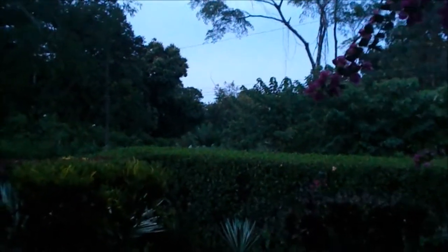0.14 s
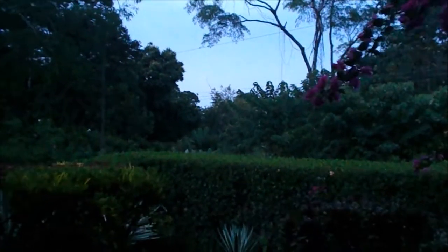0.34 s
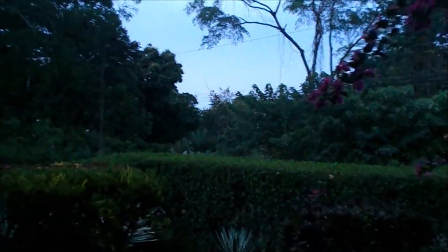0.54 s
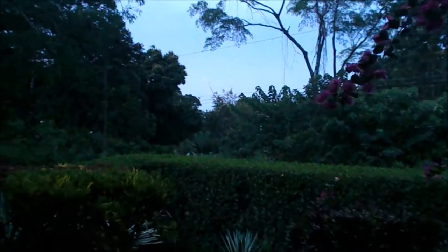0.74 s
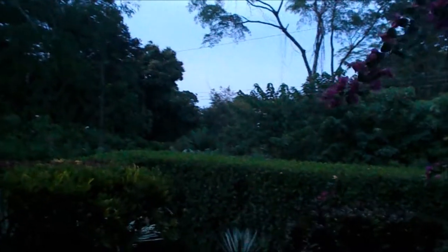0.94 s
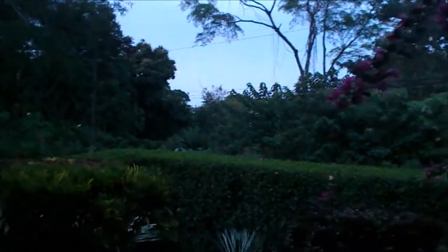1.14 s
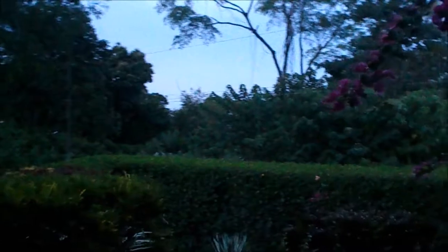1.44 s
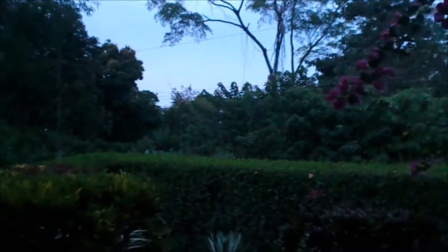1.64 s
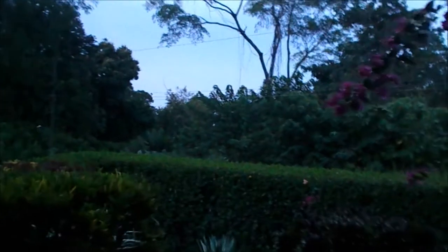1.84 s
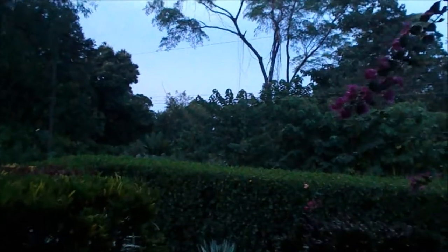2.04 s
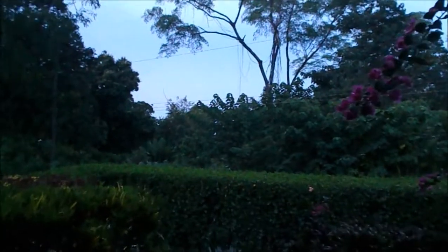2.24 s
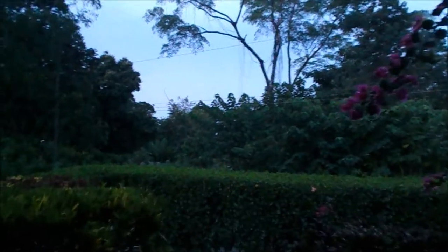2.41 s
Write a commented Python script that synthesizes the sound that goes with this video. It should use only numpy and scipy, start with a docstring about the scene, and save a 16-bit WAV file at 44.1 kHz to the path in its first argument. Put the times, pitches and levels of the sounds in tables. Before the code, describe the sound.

A distant, rasping roar of howler monkeys echoes through the trees, breaking into hoots and fading. Closer birds sing rising whistles, a slowing trill and high peeps above an outdoor insect wash, with one short rustle and tiny ticks nearby.

```python
"""Howler monkeys roar far off in dawn woodland, ending in a few hoots and dying away. The roar is a source and
filter: uneven pulses and rasp excite throat resonances that move with the mouth. Nearer birds sing gliding
tones: rising pairs of whistles, a slowing trill, slurs and peeps. Trunks and foliage scatter these calls into
echoes, over a trilling cricket and a wash of insects and far birds. Close by there is one rustle and two ticks,
and a faint dull click sounds at 1.425 s."""
import sys
import numpy as np
from scipy import signal
from scipy.fft import rfft, irfft
from scipy.io import wavfile
from scipy.ndimage import uniform_filter1d

SR = 44100
rng = np.random.default_rng(int(sys.argv[2]) if len(sys.argv) > 2 else 0)


def digitize_waveform(pressure):
    """Quantize a signal to 16-bit integers and store it at the path in sys.argv[1].

    Rows of a 2-D input are taken as channels; values are limited to [-1, 1].
    """
    field = np.atleast_2d(pressure).T
    bounded = np.clip(field, -1, 1)
    quanta = np.round(bounded * 32767).astype(np.int16)
    wavfile.write(sys.argv[1], SR, quanta)


N = 113337
T = np.arange(N) / SR
NOTE_EDGE_S = .008  # onset and release of a note

# reverberation time among the trees (f/Hz, time to fall 60 dB/s)
FOREST_T60 = [(300, 0.96), (2500, 0.7), (8000, 0.69)]
# envelopes of the roar (t/s, relative level of the low formants/dB, of the high formants/dB)
ROAR_LEVELS = [(0, -25.5, -19), (.12, -30, -28.5), (.31, -34.5, -28.5), (.48, -28.5, -27.5),
               (.75, -31, -27), (.87, -26, -27), (1.1, -30.5, -29.5), (1.25, -30.5, -27.5),
               (1.4, -29.5, -31), (1.52, -38, -30.5), (1.57, -30.5, -33), (1.64, -35.5, -30),
               (1.8, -45, -30.5), (1.87, -38, -36.5), (2.12, -42, -34), (2.42, -45.5, -43),
               (2.57, -39, -37.5)]
# low and high throat resonances at a mouth factor of 1 (f/Hz, width/Hz, relative level/dB)
LOW_FORMANTS = [(449, 152, 0.5), (503.7, 103, 4.5)]
HIGH_FORMANTS = [(800, 330, -1.5), (942.4, 193, 1.5), (1291, 460, -8), (1520, 150, -10), (2040, 500, -10.5)]
# mouth opening (t/s, factor on all formant frequencies)
MOUTH_FACTOR = [(0, 0.93), (.17, 1.054), (.5, 0.93), (.72, 1.028), (1.0, 0.97), (1.27, 0.91), (1.5, 1.015),
                (1.62, 0.98), (1.8, 0.94), (2.57, 1.045)]
# clear hoots within the roar (t/s, duration/s, start f/Hz, end f/Hz, level/dB)
HOOT_NOTES = [(.02, 0.18, 890, 1007, -33.5), (.17, .15, 324.6, 284, -50.5), (.43, 0.17, 512, 494, -25.5),
              (.468, 0.055, 817, 824, -26), (.62, .2, 306.5, 285.4, -53), (.66, 0.097, 498, 470, -30.5),
              (.81, 0.099, 824, 820, -28.5), (1.04, .17, 287, 268, -54), (1.395, 0.092, 507.5, 468, -24.5),
              (1.62, 0.14, 921, 871, -30.5), (1.665, 0.16, 518, 484.4, -26.5)]
# envelope of the cricket (t/s, level/dB)
CRICKET_LEVEL = [(0, -19.5), (.04, -42), (.11, -25), (.2, -34), (.36, -34), (.51, -27), (.54, -40),
                 (.65, -25), (.71, -40), (.74, -30.5), (.9, -28), (1.12, -30), (1.18, -40), (1.23, -27),
                 (1.4, -27), (1.45, -26.5), (1.57, -39), (1.6, -26), (1.7, -25.5), (1.74, -37),
                 (1.82, -26.5), (1.89, -41), (1.92, -23.5), (1.98, -38), (2.02, -24.5), (2.12, -32),
                 (2.16, -23.5), (2.3, -26), (2.38, -33.5), (2.57, -38)]
# spectrum of far birds, insects and leaves (f/Hz, relative level/dB)
WASH_SPECTRUM = [(20, -61), (70, -44), (130, -42.5), (250, -30.5), (340, -28), (440, -9), (680, -9),
                 (1200, -12), (1950, -9.5), (2350, -1.5), (2800, 1.5), (3300, -12), (3900, -14),
                 (4800, -21), (5400, -18), (5850, -10.5), (6350, -15), (7200, -27.5), (9800, -29.5),
                 (11000, -36.5)]
# envelope of the far bird chorus (t/s, level/dB)
CHORUS_LEVEL = [(0, -32.5), (.5, -42.5), (.9, -28.5), (1.3, -31.5), (1.75, -45.5), (1.95, -30.5),
                (2.3, -29.5), (2.57, -42)]
# unevenness of the wash (f/Hz, rms level fluctuation/dB)
WASH_FLUCTUATION = [(300, 3), (1500, 2.5), (3200, 3), (5000, 4), (8000, 3.5)]
# upward chips of the falling trill (t/s, middle f/Hz, level/dB)
TRILL_CHIPS = [(.045, 6080, -38), (.135, 6400, -46), (.23, 5910, -36.5), (.31, 5730, -37), (.4, 5600, -35),
               (.485, 5680, -35), (.572, 5620, -35), (.668, 5820, -38), (.75, 5490, -36),
               (.843, 5300, -35.5), (.941, 5320, -31.5), (1.025, 5250, -31), (1.158, 5250, -31.5),
               (1.265, 5390, -36.5), (1.37, 4900, -42), (1.475, 5000, -42.5), (1.595, 4780, -54),
               (1.73, 4350, -44), (1.86, 4360, -42.5), (2.01, 4140, -42), (2.152, 4180, -43)]
# one level whistle, then rising pairs (t/s, duration/s, start f/Hz, end f/Hz, level/dB)
WHISTLE_NOTES = [(.068, 0.068, 2820, 2805, -18.5), (.35, 0.15, 2224, 3007, -20.5),
                 (.52, 0.16, 2280, 2860, -22), (1.09, 0.12, 2233, 2992, -23.5),
                 (1.255, .15, 2225, 2845, -22.5), (1.82, 0.16, 2240, 3014, -25),
                 (1.985, 0.18, 2232, 2832, -23.5)]
# slurred notes of other birds (t/s, duration/s, start f/Hz, end f/Hz, level/dB)
SLUR_NOTES = [(.115, 0.096, 9300, 9300, -47), (.525, 0.046, 8540, 8250, -47.5),
              (.585, 0.08, 3188, 3250, -27), (.61, 0.17, 3980, 4590, -40), (1.12, 0.054, 6430, 8360, -33),
              (1.165, 0.0504, 8500, 8860, -35), (1.925, 0.052, 8700, 8230, -44),
              (2.28, 0.15, 3300, 3474, -34), (2.44, 0.14, 3340, 3170, -29.5)]
# contour of one long falling whistle (t/s, f/Hz, level/dB)
FALLING_CONTOUR = [(.725, 4000, -38), (.738, 3924, -29), (0.771, 3670, -33), (.805, 3505, -27),
                   (0.851, 3416, -32), (1.02, 3330, -41)]
# spectrum of the rustle (f/Hz, relative level/dB)
RUSTLE_SPECTRUM = [(200, -58), (1400, -30), (2100, -10), (2900, -4), (4200, -22), (5500, -16.5),
                   (7200, -24.5), (10400, -25), (11200, -49)]
# close ticks (t/s, level/dB)
TICK_EVENTS = [(1.0605, -8.5), (2.0912, -5)]
# short clear peeps (t/s, duration/s, start f/Hz, end f/Hz, level/dB)
PEEP_NOTES = [(1.308, .1, 7400, 6520, -29), (1.497, .035, 5400, 5330, -38), (1.625, 0.036, 5080, 5130, -34)]
# long thin whistles (t/s, duration/s, start f/Hz, end f/Hz, level/dB)
THIN_NOTES = [(1.8, 0.22, 7370, 7310, -50), (2.03, 0.18, 7150, 7080, -51)]


def amp(db):
    """Amplitude ratio of a level in decibels."""
    return 10 ** (np.asarray(db) / 20)


def unit(x):
    """Normalisation to an rms of 1."""
    return x / np.sqrt(np.mean(abs(x) ** 2) + 1e-20)


def envelope(points, column=1):
    """Amplitude envelope, interpolated in decibels over time."""
    rows = np.array(points)
    return amp(np.interp(T, rows[:, 0], rows[:, column]))


def at_frequency(points, hz):
    """Interpolation on a logarithmic frequency axis."""
    f, value = np.transpose(points)
    return np.interp(np.log(hz + 1), np.log(f + 1), value)


def colour(x, spectrum):
    """Spectral shaping by a tabulated filter, at an rms of 1."""
    gain = amp(at_frequency(spectrum, np.fft.rfftfreq(N, 1 / SR)))
    return unit(irfft(rfft(x) * gain, N))


def drift(rate_hz):
    """Random modulation: low-pass noise with an rms of 1."""
    rolloff = 1 + (np.fft.rfftfreq(N, 1 / SR) / rate_hz) ** 4
    return unit(irfft(rfft(rng.standard_normal(N)) / rolloff, N))


def resonate(x, hz, width_hz):
    """Double-pole resonance of unit gain, whose centre frequency may move."""
    carrier = np.exp(2j * np.pi * np.cumsum(hz * np.ones(N)) / SR)
    pole = np.exp(-np.pi * width_hz / SR)
    baseband = signal.lfilter([(1 - pole) ** 2], [1, -2 * pole, pole * pole], x / carrier)
    return 2 * (carrier * baseband).real


def add(mix, start_s, sound):
    """Superposition of a sound on the mix from a given time."""
    part = mix[max(round(start_s * SR), 0):][:len(sound)]
    part += sound[:len(part)]


def forest(x, wet_db):
    """Reverberation: trunks and foliage scatter part of the power into an exponentially decaying tail."""
    hz, t, spectra = signal.stft(rng.standard_normal(SR), SR, nperseg=256)
    decay = amp(-60 * t / at_frequency(FOREST_T60, hz)[:, None])
    tail = signal.istft(spectra * decay, SR, nperseg=256)[1]
    echo = signal.fftconvolve(x, tail / np.linalg.norm(tail))[:N]
    return (x + amp(wet_db) * echo) / np.hypot(1, amp(wet_db))


def notes(rows, bend, crest, taper, waver, waver_hz, flutter_db):
    """Modulated sine tones: bend > 1 levels off the glide, crest > 1 delays the peak of the swell."""
    out, wobble, flutter = np.zeros(N), drift(waver_hz), drift(waver_hz)
    for start, length, from_hz, to_hz, db in rows:
        progress = np.arange(0, length, 1 / SR) / length
        samples = (np.arange(len(progress)) + round(start * SR)) % N
        glide = to_hz + (from_hz - to_hz) * abs(1 - progress) ** bend
        hz = glide * (1 + waver * wobble[samples])
        tone = np.sin(2 * np.pi * np.cumsum(hz) / SR) * amp(flutter_db * flutter[samples])
        swell = abs(np.sin(np.pi * progress ** crest)) ** taper
        gate = np.minimum(np.minimum(progress, 1 - progress) * length / NOTE_EDGE_S, 1)
        add(out, start, amp(db) * unit(gate * swell * tone))
    return out


def throat(drive, formants):
    """Formant filtering: parallel resonances of alternating sign follow the mouth opening."""
    mouth = np.interp(T, *np.transpose(MOUTH_FACTOR))
    return unit(sum((-1) ** k * amp(db) * unit(resonate(drive, hz * mouth, width))
                    for k, (hz, width, db) in enumerate(formants)))


def howler_roar(growl_hz=61.83, jitter=.2, roughness=.55):
    """Source and filter: uneven pulses and rasp, smeared by distance, excite the throat resonances."""
    cycles = np.cumsum(growl_hz * (1 + jitter * drift(25))) / SR
    pulses = np.diff(np.floor(cycles), prepend=0)
    rasp = np.exp(-(cycles % 1) / .62) * rng.standard_normal(N)
    drive = forest((1 - roughness) * unit(pulses) + roughness * unit(rasp), wet_db=1)
    low = throat(drive, LOW_FORMANTS) * envelope(ROAR_LEVELS, column=1)
    high = throat(drive, HIGH_FORMANTS) * envelope(ROAR_LEVELS, column=2)
    highpass = signal.butter(6, 350, "highpass", fs=SR, output="sos")
    return signal.sosfilt(highpass, amp(1) * (low + high))


def cricket(hz=2176, direct_share=.73):
    """Interference: a cricket's tone beats against its echoes, a narrow band of noise."""
    tone = unit(np.sin(2 * np.pi * hz * T))
    scattered = unit(resonate(rng.standard_normal(N), hz, width_hz=55))
    return envelope(CRICKET_LEVEL) * unit(direct_share * tone + (1 - direct_share) * scattered)


def woodland_wash(chorus_band_hz=(2570, 3510)):
    """Incoherent addition: far birds, insects and leaves blur into noise, patchy in time and frequency."""
    wash = amp(-28.5) * colour(rng.standard_normal(N), WASH_SPECTRUM)
    bandpass = signal.butter(3, chorus_band_hz, "bandpass", fs=SR, output="sos")
    chorus = envelope(CHORUS_LEVEL) * unit(signal.sosfilt(bandpass, rng.standard_normal(N)))
    hz, _, spectra = signal.stft(wash + chorus, SR, nperseg=1024, noverlap=768)
    patches = uniform_filter1d(rng.standard_normal(spectra.shape), size=4, axis=0)
    patches = unit(uniform_filter1d(patches, size=8, axis=1))
    gain = amp(at_frequency(WASH_FLUCTUATION, hz)[:, None] * patches)
    return signal.istft(spectra * gain, nperseg=1024, noverlap=768)[1][:N]


def howler_hoots():
    """Tonal voicing: nearly pure tones glide linearly and stand out from the roar."""
    hoots = notes(HOOT_NOTES, bend=1, crest=1.15, taper=.45, waver=.012, waver_hz=40, flutter_db=2)
    return forest(hoots, wet_db=-10)


def bird_trill(chip_s=.029, lengthening_per_s=.55, sweep=.075):
    """Chirp train: each chip sweeps upward while the series slows and falls in pitch."""
    chips = [(s, chip_s * (1 + lengthening_per_s * s), hz * (1 - sweep), hz * (1 + sweep), db)
             for s, hz, db in TRILL_CHIPS]
    trill = notes(chips, bend=2.3, crest=.7, taper=.5, waver=.011, waver_hz=400, flutter_db=3.5)
    return forest(trill, wet_db=-6)


def bird_whistles():
    """Frequency glides: a bird's paired tones rise quickly and level off."""
    song = notes(WHISTLE_NOTES, bend=1.65, crest=1.5, taper=.4, waver=.003, waver_hz=100, flutter_db=2)
    return forest(song, wet_db=-7)


def bird_slurs():
    """Reverberant smearing: gliding notes blend with echoes slightly stronger than the direct sound."""
    slurs = notes(SLUR_NOTES, bend=1.2, crest=.73, taper=.41, waver=.0174, waver_hz=290, flutter_db=3.5)
    return forest(slurs, wet_db=1)


def falling_whistle():
    """Frequency and amplitude modulation: a bird's tone drops, then wavers on the low note as it fades."""
    times, hz, _ = np.transpose(FALLING_CONTOUR)
    pitch = np.interp(T, times, hz) * (1 + .014 * drift(250))
    gate = np.clip(np.minimum(T - times[0], times[-1] - T) / NOTE_EDGE_S, 0, 1)
    tone = unit(np.sin(2 * np.pi * np.cumsum(pitch) / SR)) * amp(3.5 * drift(90))
    return forest(gate * envelope(FALLING_CONTOUR, column=2) * tone, wet_db=-1)


def rustle(peak_s=1.044, rise_s=.026, hold_s=.039, fall_s=.042, grain_db=1.8):
    """Amplitude-modulated noise: a grainy brush close by swells, holds and fades exponentially."""
    rise = np.exp(-np.maximum(peak_s - T, 0) / rise_s)
    fall = np.exp(-np.maximum(T - peak_s - hold_s, 0) / fall_s)
    grains = rng.standard_normal(N) * amp(grain_db * drift(610))
    return amp(-16.5) * rise * fall * colour(grains, RUSTLE_SPECTRUM)


def ticks(ring_hz=2746, ring_s=.00075, snap_s=.0004):
    """Damped oscillation: each tiny tick is a snap of noise and a very short ring, without bass."""
    out, t = np.zeros(N), T[:SR // 50]
    ring = np.sin(2 * np.pi * ring_hz * t) * t / ring_s * np.exp(1 - t / ring_s)
    for start, db in TICK_EVENTS:
        snap = .17 * rng.standard_normal(len(t)) * np.exp(-t / snap_s)
        add(out, start, amp(db) * (snap + ring))
    return signal.sosfilt(signal.butter(3, 1200, "highpass", fs=SR, output="sos"), out)


def bird_peeps():
    """Tone bursts: short high notes, each trailed by its echoes."""
    peeps = notes(PEEP_NOTES, bend=1.2, crest=.7, taper=.5, waver=.01, waver_hz=400, flutter_db=3)
    return forest(peeps, wet_db=-2)


def dull_click(start_s=1.425, decay_s=.00014):
    """Exponential pulse: its spectrum falls toward the treble, so the faint click sounds dull."""
    out = np.zeros(N)
    add(out, start_s, amp(-19) * np.exp(-T[:SR // 50] / decay_s))
    return out


def thin_whistles():
    """Narrow-band tones: two faint, high bird notes of almost constant frequency."""
    thin = notes(THIN_NOTES, bend=1.2, crest=.7, taper=.6, waver=.002, waver_hz=150, flutter_db=2)
    return forest(thin, wet_db=-1)


def scene():
    """Superposition of all the woodland sources, in mono."""
    howlers = howler_roar() + howler_hoots()
    birds = bird_trill() + bird_whistles() + bird_slurs()
    birds += falling_whistle() + bird_peeps() + thin_whistles()
    return (howlers + birds + cricket() + woodland_wash() + rustle() + ticks() + dull_click())[None]


def record(dry):
    """Band limiting: a linear-phase low-pass filter cuts off at 11.1 kHz."""
    lowpass = signal.firwin(511, 11100, window=("kaiser", 9), fs=SR)
    return signal.oaconvolve(dry, lowpass[None], "same")


dry = scene()
out = record(dry)
digitize_waveform(out)
```